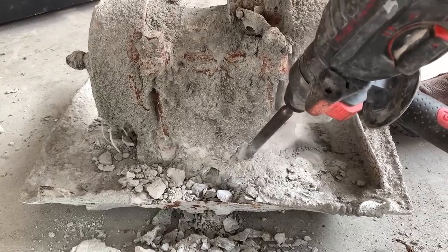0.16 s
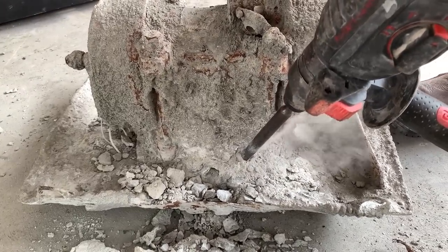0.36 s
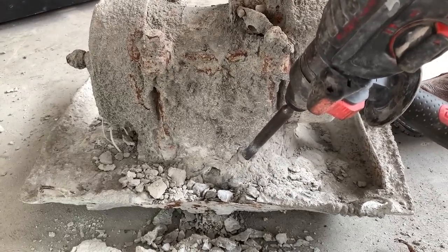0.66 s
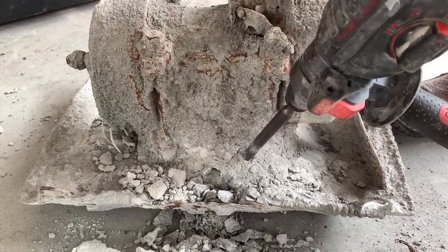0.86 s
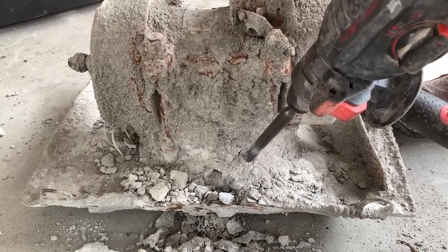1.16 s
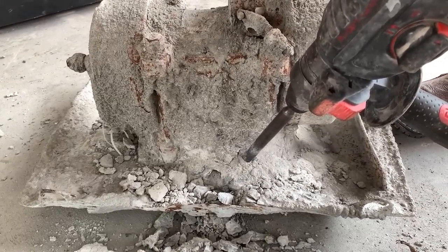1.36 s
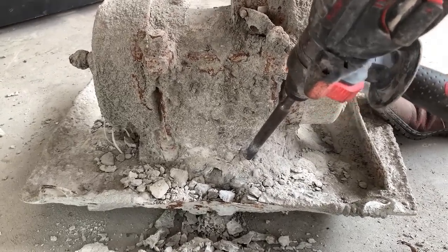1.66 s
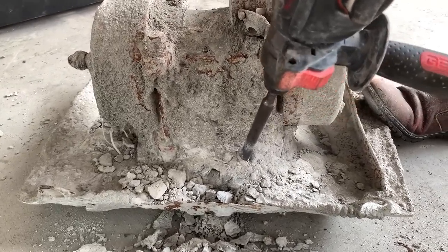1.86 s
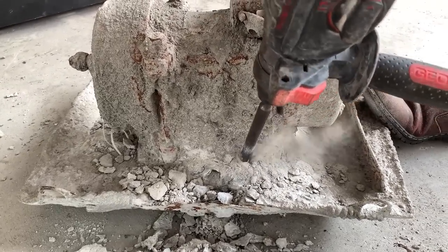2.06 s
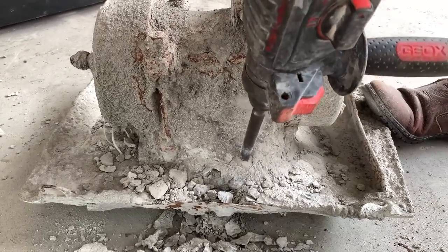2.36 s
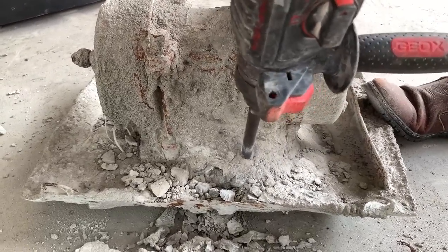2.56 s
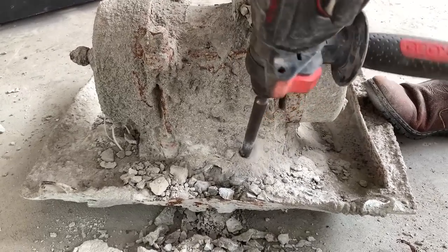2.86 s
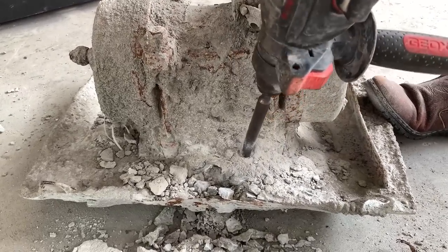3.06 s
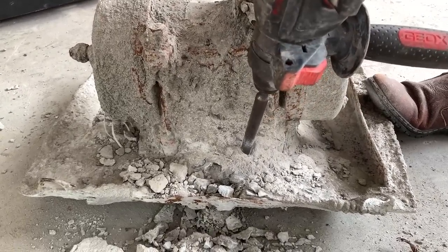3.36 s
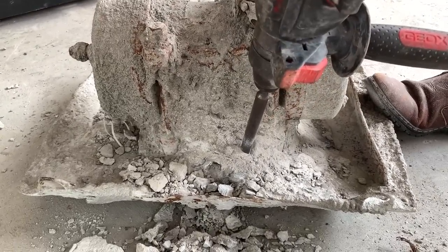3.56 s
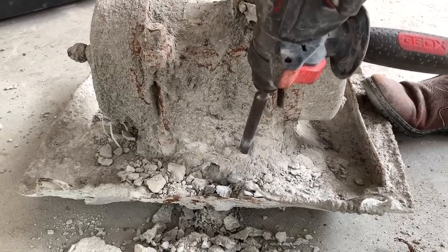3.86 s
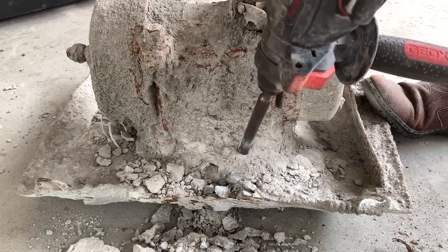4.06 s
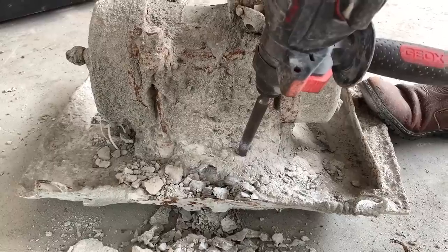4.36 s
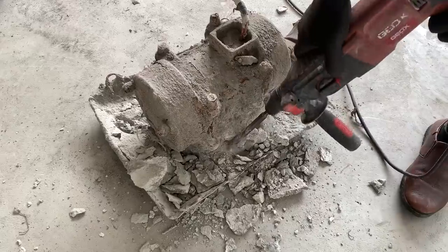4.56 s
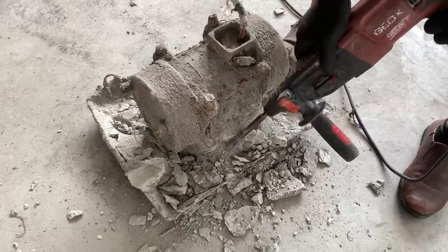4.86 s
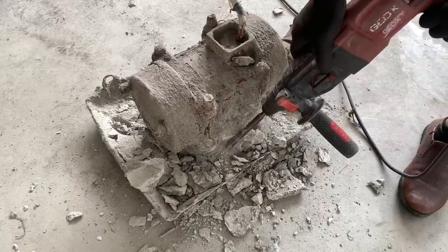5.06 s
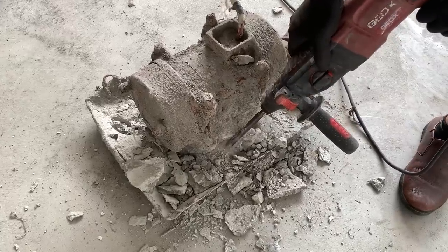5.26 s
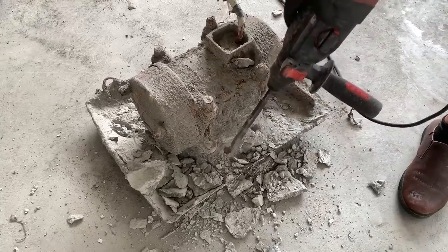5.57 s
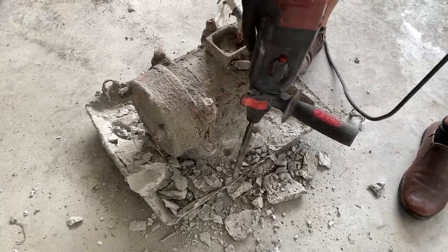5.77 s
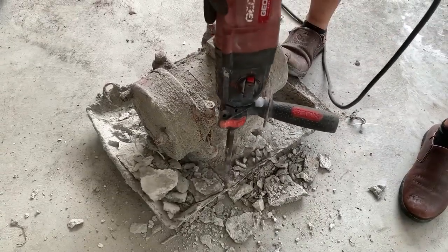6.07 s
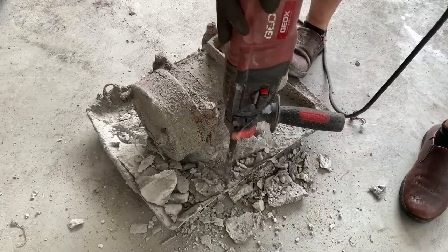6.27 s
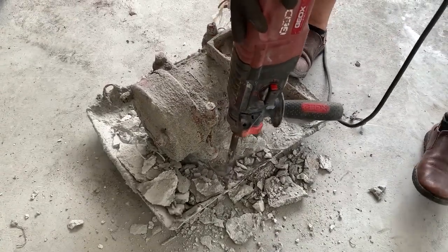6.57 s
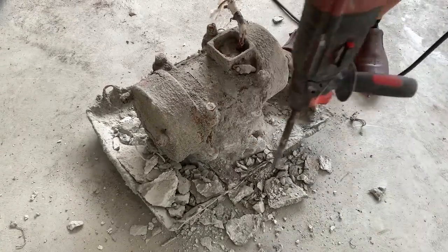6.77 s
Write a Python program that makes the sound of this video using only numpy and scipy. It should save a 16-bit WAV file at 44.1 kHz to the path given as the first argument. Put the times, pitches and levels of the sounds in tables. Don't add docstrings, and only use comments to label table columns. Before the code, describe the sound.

Harsh, fast metallic hammering with motor hum and dusty hiss runs in three bursts, coasting down to loose clacks between them in a workshop.

```python
import sys
import numpy as np
from scipy import signal
from scipy.fft import rfft, irfft, next_fast_len
from scipy.io import wavfile
from scipy.ndimage import uniform_filter1d, map_coordinates

SR = 44100
rng = np.random.default_rng(int(sys.argv[2]) if len(sys.argv) > 2 else 0)


def bounce(signal):
    frames = np.transpose(np.atleast_2d(signal))
    limited = np.clip(frames, -1, 1)
    pcm = np.round(limited * 32767).astype(np.int16)
    wavfile.write(sys.argv[1], SR, pcm)


def invert_db(x):
    u = np.asarray(x, float) / 20
    return 10 ** u


N = 305172


# centre_hz, width_hz, level_db, left_over_right_db, left_lead_rad
STEEP = [(910, 93, -20, 4, -0.84), (1474, 360, -8, -5, 0.97), (2040, 32, 0.5, 7, -0.53),
         (2666, 59, -3.5, 14.5, 1.57), (2812, 220, -6, 14, 0.0836), (3270, 825, 1, -5, -0.48),
         (3457, 663, -2, -10.5, -0.99), (3697, 85, -0.2, -15, 0.46), (3900, 1000, -13.5, 11.5, 2.5),
         (3990, 305, -0.25, -9, -2), (4156, 120, -11.5, -18.5, -1.92), (5080, 64, -7, -17.5, 1.5),
         (5430, 204, -11.5, -6, 2.5), (6290, 87, -7, 14.5, 3), (7180, 900, -10.5, -3, 1.35),
         (8700, 680, -22, 14, 0.8), (9350, 100, -11, -10.5, -2.5), (10140, 370, -11.5, -1, -0.75),
         (12500, 190, -11.5, -3, -3.5), (11670, 93, -22, 6, -1), (13330, 1300, -19, -10, 3),
         (14300, 133, -19.5, 12, 2.5), (16600, 130.0, -47, -32, -55)]
SHIFTING = [(580, 110, -13.5, -4, 0.5), (1293, 240, -7, 1.5, -2.13), (1505, 79, -1.5, -6.5, -1.46),
            (2081, 74, -2.5, 1, 0.7142), (2430, 28, -3.5, 2.5, 0.72), (3170, 134, -9, -0.5, -1.9),
            (3400, 190, -9.5, -12.5, 2.5), (3693, 198, 0.5, 6.5, 0), (3836.4, 86, 1, -3.5, 2.5),
            (3908, 115, 5, 4.5, 2.5), (4256, 295, -1, -3.5, 0.72), (5230, 80, -3.5, 7.5, 1.2),
            (6090, 86, -6.5, -8.5, 0), (6460, 217, -12, 13, 1.9), (6890, 126, -4.5, -3, -1.5),
            (7380, 56, -8.5, -2, 2), (7950, 230, -8, 2, -0.2), (9530, 940, -12, -2.5, 0.66),
            (9730, 68, -17.5, -27.5, 14), (12400, 95, -16, 4, 4), (13565.0, 160, -28, -5, -3.5),
            (14221.0, 130.0, -34, -12, -8), (15079.0, 130.0, -38, -7, -12)]
PRESSED = [(1195, 180, -7.5, -3.5, 0), (1435, 280, -7.5, -3, 0.2), (1590, 83, -3, 1, 0.2),
           (2068, 68, -1.5, 1, -0.5), (2608, 104, -8, -1.5, 0.8), (2968, 46.6, -2, -3, -0.04),
           (3630, 340, 0.5, -0.5, 0.58), (3831, 79, -5.5, -9.5, -3.5), (3872, 74, -10.5, -11, -0.5),
           (3980, 255, 3.5, -3, 0.73), (4134, 168, 4.5, 1.5, 0.22), (4680, 75, 0.5, -3, -3.5),
           (5020, 107, -3.5, -9, -1.1), (6280, 290, -2, 1, 1.55), (6840, 270, -4, 2.5, 1.9),
           (8690, 250, -6, -4, 0.6), (9380, 100, -2.5, 0.5, 1.5), (9900, 840, -8.5, 2, -0.12),
           (11400, 670, -11.5, 3, -2.5), (12528.0, 208.0, -31, -2, 3.05), (14005.0, 133.0, -32, 20, 1.5),
           (15107.0, 151.0, -26, 1.5, -3), (15800, 230, -19, -14, 1.5)]
SIDEWAYS = [(1285, 500, -11.5, -2.5, 0.46), (2067, 70, 2, 1, 0.64), (2520, 200, -0.5, 0.5, -3),
            (2743, 88, 5, -3.5, 0.25), (2860, 1113, -6.5, 5.5, 2.0759), (3350, 257, -1.5, 8, 2.5),
            (3500, 192.5, -1.6, -10.5, 0.4), (3650, 250, -2.5, 1, 1.35), (3750, 720, -5, 0, 4),
            (4070, 110, -18.5, -9, 3), (4350, 230, -2.5, -9, 1), (4500, 66, -16, -5, -0.98),
            (5284, 57, -5, 3, -3.5), (5794, 25, -4.5, 1, 4.5), (6700, 100, -14, -3, 4.5),
            (8087.0, 75, -10.5, 5, 2.5), (9130, 51, -11.5, -7.5, 1), (9860, 670, -16.5, -1.5, 1.6),
            (11120, 170, -8.5, -1, 1.17), (12100, 450, -24, 0, 1.3), (13600, 1000, -20.5, -5, -4),
            (15300, 316.0, -26, 12, 4.5), (15200, 652.0, -39, 3.9, 2)]
UPRIGHT = [(676, 74, -8.5, -7, 0.5), (1050, 230, -9, 0.2, 0.5), (1430, 160, -11, 1.5, 1),
           (1860, 330, -3.5, 6.5, 0.77), (2370, 620, -0.8, 1, 0.35), (2652, 105, 4, -3, 1.3),
           (3108, 110, -11, 6, 2), (3297, 78, -10, -9, 2), (3202, 960, -2.5, 2.5, -2),
           (3780, 460, -5, 6, -2), (4590, 268, -8, 10, 2), (5020, 300, -2, 0, 0.34),
           (5710, 200, -3.5, -1.5, 0.57), (5970, 710, -10, 3.5, 0.7), (7400, 390, -28, -9, 1.5),
           (8840, 580, -20.5, -6, 2), (11000, 150, -25, -15, 5.5), (11070, 330, -21.5, -11, -2),
           (12200, 560, -29.5, 22, -13), (12800, 62, -21, -14.5, 4), (14300, 176.0, -34.5, 14, 1.5),
           (15003.0, 133.0, -52, 9, -4), (15100, 817.0, -35, -9, 3)]
# centre_hz, width_hz, level_db
SKIDDING = [(620, 210, -6), (1040, 360, -11), (1320, 250, -9), (2500, 400, -8), (3110, 440, -9.5),
            (1874, 350, -3), (3760, 120, 4), (4091.7, 66, 2.5), (5500, 430, -3), (6200, 100, -5),
            (6865, 64, 1.5), (7140, 300, 1.5), (7870, 174, -1), (8370, 192, 3), (8800, 100, 6),
            (9470, 120, 3.5), (10300, 110, -6.5), (15400, 200, -6)]
# centre_hz, width_hz, level_db
BITING = [(720, 94, -7), (1050, 130, -8), (1389, 140, -5.5), (1912, 200, -1), (2220, 290, 1.7),
          (2800, 240, 0), (3250, 400, -3.5), (3620, 200, 0), (4500, 272, -5.5), (4994, 308, -3.5),
          (5500, 217, -7), (6000, 450, -7.5), (7030, 480, -16), (8400, 410, -17), (10000, 500, -24),
          (11400, 500, -23), (13600, 600, -27), (15300, 500, -26)]
# centre_hz, width_hz, level_db
SLIDING = [(700, 78, -8), (1075, 130, -7), (1390, 110, -6), (1900, 200, -2.5), (2430, 280, 0.3),
           (2700, 170, 0), (3155, 320, -0.5), (3720, 220, -3), (4860, 270, -4), (5320, 340, -4),
           (5800, 350, -6), (7130, 300, -15.5), (8400, 400, -15), (9500, 370, -24), (11000, 450, -16.5),
           (12800, 500, -22), (15200, 500, -23)]
STANCE_CHANGES = [
    1.588,
    2.035,
    3.161,
    4.441,
    5.532,
    5.82,
    6.039,
    6.51,
    6.762,
]
STANCE_TAKEN = [
    0,
    5,
    1,
    2,
    3,
    1,
    6,
    4,
    7,
    1,
]
SHINE = [-3.5, 2.5, -2.5, 0.5, -1.5, 7, 0.5, -2.5]
# freq_hz, level_db
CRUSH_COLOUR = [(300, 0), (700, -10.5), (1500, 0), (3000, 1.5), (6000, 6.5), (10000, 4), (12500, 3),
                (15000, 2)]
# freq_hz, level_db
AIR_COLOUR = [(200, -35.5), (400, -32), (700, -40), (1200, -46), (3000, -5.5), (8000, -3.5), (12000, -6.5),
              (15500, -8)]
# start_s, peak_db, bit_ring_over_peak_db
COASTING_BLOWS = [(4.3, -53.5, -5), (4.328, -53.5, -1), (4.3654, -52.5, -1.5), (4.424, -59, -23),
                  (4.453, -57, -11), (5.735, -36, -21), (5.74, -43, -25), (5.757, -41, -26),
                  (5.783, -43.5, -24), (5.8115, -38.5, -22.5), (5.8301, -36.5, -20.5), (6.7955, -48, -9),
                  (4.5318, -48, -2)]
# start_s, peak_db, bit_ring_over_peak_db
TICKS = [(4.4584, -64, -19), (4.4667, -55, -14), (6.7764, -50, -15), (6.7884, -50, -14), (6.8118, -48, -17),
         (6.8214, -52, -17), (6.8271, -51, -12), (6.8344, -56, -15), (6.841, -54.5, -17), (6.853, -53, -15),
         (6.8564, -56, -15), (6.8674, -56, -16), (6.8784, -64, -17), (6.8994, -58, -16)]


def hammer(strike, crush, air, blow_db, ring_db):
    split_hz, blend_s, shine_hz = 6000, .06, 11500
    s, peak_db, bright_db = np.transpose(COASTING_BLOWS + TICKS)
    thud = pulses(s, invert_db(peak_db + 10.5))
    ping = pulses(s, invert_db(peak_db + 15.5 + bright_db))
    stances = [STEEP, SHIFTING, PRESSED, SIDEWAYS, UPRIGHT,
               facing(SKIDDING, SHIFTING), facing(BITING, UPRIGHT), facing(SLIDING, UPRIGHT)]
    out = np.zeros((2, 2, N + SR))
    t = np.arange(N) / SR
    edges = [-1, *STANCE_CHANGES, 9]
    paths = rng.standard_normal((len(SHINE), 32))
    for taken, a, b in zip(STANCE_TAKEN, edges, edges[1:]):
        held = np.sqrt(np.clip(np.minimum(t - a, b - t) / blend_s + .5, 0, 1))
        span = slice(*np.flatnonzero(held)[[0, -1]])
        m = next_fast_len(span.stop - span.start + SR // 20)
        place = slice(span.start, span.start + m)
        hz = np.fft.rfftfreq(m, 1 / SR)
        high = 1 / (1 + (split_hz / (hz + 1)) ** 6)
        clean = ringing(stances[taken], hz, widen=1.0)
        rough = ringing(stances[taken], hz, widen=3.1) * invert_db(along(CRUSH_COLOUR, hz))
        travel = np.exp(1.3j * map_coordinates(paths[taken], [hz / 800]))
        shine = invert_db(SHINE[taken] / (1 + (shine_hz / (hz + 1)) ** 16))
        for band, db, coast in [(1 - high, blow_db, thud), (high, blow_db + ring_db, ping)]:
            drive = held * invert_db(db)
            hits = (drive * strike + held * coast)[span]
            rung = rfft(hits, m) * unit(clean * band)
            out[0, :, place] += irfft(rung * travel * shine, m)
            ragged = rfft((drive * crush)[:, span], m) * unit(rough * band)
            hiss = rfft((drive * air)[:, span], m) * invert_db(along(AIR_COLOUR, hz)) * band
            out[1, :, place] += irfft((ragged + hiss) * shine, m)
    return out[..., :N]


def ringing(modes, hz, widen):
    bass_hz = 910
    side = np.array([[.5], [-.5]])
    both = 0
    for k, (centre, width, db, pan_db, lead) in enumerate(modes):
        loss = 1j * hz * width * widen
        port = invert_db(db + side * pan_db) * np.exp(1j * side * lead * hz / centre)
        both = both + (-1) ** k * port * loss / (centre * centre - hz * hz + loss)
    return both / (1 + (bass_hz / (hz + 1)) ** 8 / widen ** 4)


def facing(peaks, modes):
    faced = []
    for centre, width, db in peaks:
        nearest = min(modes, key=lambda mode: abs(mode[0] - centre))
        faced.append((centre, max(width, 70), db, *nearest[3:]))
    return faced


def drives(rate, blows, loose, lifted):
    puff_t60_s, glance_db, glance_scatter_db = 0.015, -1.5, 2.6
    at = (blows * SR).astype(int)
    luck = rng.standard_normal((len(blows), 4))
    weight = np.sqrt(SR / rate[at])
    strike = pulses(blows + 8e-6 * luck[:, 0], weight * invert_db(0.078 * luck[:, 1])) * np.sqrt(1 - loose)
    late = blows + 0.000804 * loose[at] * luck[:, 2]
    puff = invert_db(-60 * np.arange(SR // 20) / SR / puff_t60_s)
    bursts = pulses(late, weight * invert_db(0.76 * loose[at] * luck[:, 3]))
    gate = signal.fftconvolve(bursts, puff / np.linalg.norm(puff))[:N]
    chips = rng.standard_normal((3, N))
    grit = np.abs(gate) + 0.56 * invert_db(5.8 * wobble(90))
    crush = (chips[0] + 0.43 * chips[1:]) * grit * np.sqrt(loose)
    air = (chips[0, ::-1] + 1.24 * rng.standard_normal((2, N))) * (0.621 + .5 * loose)
    glance_size = invert_db(glance_db + glance_scatter_db * luck[:, 3]) * loose[at] * np.sqrt(1 - lifted[at])
    glance = pulses(late, weight * glance_size)
    return strike, crush * invert_db(-4.5) + glance, air


# time_s, blow_db
LEAN = [
    [(0, -43.5), (.37, -42), (1.5, -43), (2.2, -44.5), (3.2, -42), (3.77, -40.5), (4.05, -42.5),
     (4.19, -52.5), (4.29, -64.5)],
    [(4.45, -83.5), (4.51, -66), (4.535, -59.5), (4.58, -40.5), (5.49, -41.5), (5.53, -54.5), (5.55, -56),
     (5.72, -65)],
    [(5.82, -74), (5.835, -42.5), (5.91, -36.5), (5.93, -33), (6.03, -34), (6.28, -38), (6.52, -39.5),
     (6.555, -42), (6.6, -39), (6.66, -40), (6.73, -50), (6.77, -67)],
]
BIT_RING = [0, -4.5, -3, -6, -7, -8, -6.5, -8.5]


def effort(skid, lifted):
    end_db, skid_loss_db, skid_dull_db, skid_flutter_db = -71.5, -3, -4, 4
    run_up_dull_db, run_up_dull_s, lifted_ring_db = -7, 0.15, -2
    rattle_db, rattle_t60_s = -11.5, 0.035
    t = np.arange(N) / SR
    lean = invert_db(curves(sum(LEAN, []) + [(N / SR, end_db)])[0] + skid_loss_db * skid)
    rattle = sum(invert_db(db + rattle_db - 60 * np.abs(t - s) / rattle_t60_s) * (t > s) for s, db, _ in COASTING_BLOWS)
    fresh = sum(np.exp(-((t - on) / run_up_dull_s) ** 2) * (t > on) for on, *_ in PULLS)
    ring_db = by_stance(BIT_RING) + skid * (skid_dull_db + skid_flutter_db * wobble(25.62))
    ring_db = ring_db + run_up_dull_db * fresh + lifted_ring_db * lifted
    return 20 * np.log10(lean + rattle), ring_db - 12 * rattle / (lean + rattle)


# time_s, rate_hz
RUNNING = [(.1, 173.8), (.4, 174.9), (.85, 174.2), (3.15, 174.3), (3.25, 174.9), (3.6, 175.9),
           (3.85, 175.4), (6.3, 175.6), (6.45, 175.4), (6.55, 174.8), (6.65, 173.6)]
# start_s, first_rate_hz, run_up_s, run_up_exponent
PULLS = [
    (-1, 100, .05, 1),
    (4.505, 100, .07, 1.4),
    (5.838, 85, .04, .85),
]
# start_s, coasting_s, last_regular_blow_s
RELEASES = [
    (4.04, .18, 4.288),
    (5.5, .16, 5.7),
    (6.665, .127, 6.77),
]
BEAT = [
    4.1805,
    4.5653,
    5.8432,
]


def shaft(skid):
    sag_hz = 2.3
    t = np.arange(N) / SR
    full = curves(RUNNING)[0] - sag_hz * skid
    rate = full.copy()
    for (on, start, rise, shape), (off, coast, _) in zip(PULLS, RELEASES):
        up = full - (full - start) * np.exp(-(np.abs(t - on) / rise) ** shape)
        rate = np.where(t >= on, up * np.exp(-np.maximum(t - off, 0) / coast), rate)
    turns = np.cumsum(rate) / SR
    blows = []
    for pull, release, beat in zip(PULLS, RELEASES, BEAT):
        first, mark, last = np.interp([pull[0], beat, release[2]], t, turns)
        blow_turns = mark + np.arange(np.ceil(first - mark), last - mark)
        blows.append(np.interp(blow_turns, turns, t))
    return turns, rate, rate / full, np.concatenate(blows)


# order1_db, order2_db, order3_db, order4_db, order5_db
HUM = [(-40.5, -35.5, -28, -39, -51), (-34.5, -32.5, -29.5, -31, -40), (-46, -32.5, -31, -49, -37),
       (-56, -28, -28, -34.5, -31), (-50, -39, -29, -22.5, -36), (-37, -32, -23, -33, -36),
       (-53, -33, -29.5, -32.5, -40), (-56, -32, -28.5, -27, -30)]


def casing(turns, rate, speed, blow_db, skid, lifted):
    boom_hz, boom_width_hz, boom_db = 260, 50, 9
    wake_s, speed_power, skid_db, lifted_db = .035, .5, -0.5, -8
    t = np.arange(N) / SR
    tones = 0
    for order, db in enumerate(np.transpose(HUM), 1):
        hz = order * rate
        boom = boom_db / (1 + ((hz - boom_hz) / boom_width_hz) ** 2)
        bass_loss = 10 * np.log10(1 + (150 / hz) ** 8)
        level_db = by_stance(db) + boom - bass_loss + 1.47 * wobble(12)
        tones = tones + invert_db(level_db) * np.sin(2 * np.pi * order * turns)
    awake = np.prod([1 - np.exp(-((t - on) / wake_s) ** 2) for on, *_ in PULLS], axis=0)
    level = invert_db(blow_db + skid_db * skid + lifted_db * lifted + 1.5)
    return awake * level * speed ** speed_power * tones * invert_db([[-.4], [.4]])


# start_s, level_db, freq_hz, t60_s
THUMPS = [
    (3.985, -61, 257, .25),
    (.24, -73, 112, .15),
    (2.08, -69, 140, 0.26),
    (4.36, -70, 153, 0.14),
    (5.381, -72, 130, .15),
    (5.53, -70, 720, 0.49),
    (5.735, -67, 247, 0.103),
    (5.735, -69, 353, .1),
]


def thumps():
    rise_s = 0.0057
    t = np.arange(N) / SR
    knocks = 0
    for s, db, hz, t60 in THUMPS:
        since = np.maximum(t - s, 0)
        onset = 1 - np.exp(-since / rise_s)
        knocks = knocks + invert_db(db - 60 * since / t60) * onset * np.sin(2 * np.pi * hz * since)
    return knocks


# freq_hz, t60_s
SHOP_DECAY = [(200, 0.22), (2000, 0.23), (12000, 0.046)]


def shop(x):
    hz, t, z = signal.stft(rng.standard_normal((2, SR // 2)), SR, nperseg=256)
    fade = invert_db(-60 * t / along(SHOP_DECAY, hz)[:, None])
    tail = signal.istft(z * fade, SR, nperseg=256)[1]
    delayed = np.pad(x, ((0, 0), (400, 0)))
    return signal.fftconvolve(delayed, tail / np.linalg.norm(tail[0]), axes=1)[:, :N]


# freq_hz, density_db_per_hz
RUMBLE_COLOUR = [(15, -78), (25, -85), (97, -18.5), (194, -15.5), (243, -10), (267, -14), (287, -12.5),
                 (545, -19.5), (700, -17.5), (1000, -29.5), (1900, -77)]


def rumble(level_db):
    m = next_fast_len(N)
    noise = rng.standard_normal((3, m))
    hz = np.fft.rfftfreq(m, 1 / SR)
    colour = invert_db(along(RUMBLE_COLOUR, hz)) * (hz / (hz + 60)) ** 2
    pair = irfft(rfft(noise[0] + .7 * noise[1:]) * colour, m)[:, :N]
    return invert_db(level_db) * unit(pair * invert_db(5 * wobble(9)))


def drone():
    drone_hz, drone_db = 253, -89.5
    level = invert_db(drone_db + 2.5 + 1.7 * wobble(15))
    return level * np.sin(2 * np.pi * drone_hz * np.arange(N) / SR + wobble(22))


def unit(x):
    return x / np.sqrt(np.mean(np.abs(x) ** 2) + 1e-20)


def along(points, hz):
    f, v = np.transpose(points)
    return np.interp(np.log(hz + 1), np.log(f + 1), v)


def curves(rows):
    s, *cols = np.transpose(rows)
    return [np.interp(np.arange(N) / SR, s, c) for c in cols]


def wobble(rate):
    return map_coordinates(rng.standard_normal(int(N * rate / SR) + 4), [np.arange(N) * rate / SR])


def pulses(s, size):
    at = np.asarray(s)[:, None] * SR
    near = np.floor(at) + np.arange(-7, 9)
    shape = np.sinc(near - at) * np.cos(np.pi * (near - at) / 16) ** 2
    index = np.clip(near, 0, N - 1).astype(int)
    return np.bincount(index.ravel(), (shape * np.asarray(size)[:, None]).ravel(), N)


def spells(rows, slide):
    t = np.arange(N) / SR
    return np.max([h * np.clip(np.minimum(t - a, b - t) / slide + .5, 0, 1) for a, b, h in rows], axis=0)


SLIDE_S = .04


def by_stance(values):
    edges = np.add.outer(STANCE_CHANGES, [-SLIDE_S, SLIDE_S]).ravel()
    return np.interp(np.arange(N) / SR, edges, np.repeat(np.take(values, STANCE_TAKEN), 2)[1:-1])


def drifting(x):
    drift_db = .6
    z = signal.stft(x, nperseg=512)[2]
    field = uniform_filter1d(rng.standard_normal(z.shape[-2:]), size=5, axis=0)
    field = uniform_filter1d(field, size=50, axis=1)
    return signal.istft(z * invert_db(drift_db * unit(field)), nperseg=512)[1][..., :N]


# start_s, end_s, looseness_0_1
SKIDS = [(1.59, 2.02, .95), (1.95, 2.07, .45), (2.33, 2.68, .25), (2.42, 2.59, .85), (2.79, 2.86, .7),
         (2.8, 3.1, .45), (3.05, 3.22, .25), (4.56, 4.74, .22), (5.4, 5.5, .18), (5.99, 6.05, .2),
         (6.5, 6.66, .12), (6.545, 6.57, .8)]
# start_s, end_s
LIFTS = [
    (4.27, 4.535),
    (5.51, 5.79),
    (6.73, 8),
]
SEATED = [.04, .09, .035, .06, .03, .1, .06, .05]
SHAKE = [10.1, 11, 10, 8.7, 2.4, 10.3, 8.9, 4.4]


def scene():
    skid_s, lifted_looseness, off_speed_looseness = .05, .88, .2
    rumble_db, skid_shake_db, off_speed_shake_db, coasting_shake_db = -89, 7.5, 5, 21.5
    skid = spells(SKIDS, skid_s)
    lifted = spells([(a, b, 1) for a, b in LIFTS], SLIDE_S)
    turns, rate, speed, blows = shaft(skid)
    off_speed = np.clip(10 * (1 - speed), 0, 1)
    loose = np.max([by_stance(SEATED), skid, lifted_looseness * lifted, off_speed_looseness * off_speed], axis=0)
    blow_db, ring_db = effort(skid, lifted)
    clean, ragged = hammer(*drives(rate, blows, loose, lifted), blow_db, ring_db)
    hum = casing(turns, rate, speed, blow_db, skid, lifted)
    working_db = by_stance(SHAKE) + skid_shake_db * skid + off_speed_shake_db * off_speed
    shake_db = (1 - lifted) * working_db + coasting_shake_db * lifted * speed
    direct = drifting(clean + ragged) + thumps() + drone() + hum
    steady = invert_db(-6) * clean
    walls = invert_db(-6.5) * shop(steady + ragged + invert_db(-5.5) * hum)
    return direct + walls + rumble(rumble_db + shake_db)


def low_pass(x):
    return signal.sosfilt(signal.butter(12, 16530, fs=SR, output="sos"), x)


def record(dry):
    top_hz, foot_hz, quiet_db, quiet_hz = 15830, 55, -66, 12000
    m = next_fast_len(N)
    hz = np.fft.rfftfreq(m, 1 / SR)
    kept = rfft(dry, m) * (hz < top_hz) / (1 + (foot_hz / (hz + 1)) ** 4)
    power = np.abs(uniform_filter1d(np.mean(dry ** 2, axis=0), size=900))
    level_db = 10 * np.log10(power + 1e-12)
    muted = np.clip((quiet_db - level_db) / 2 + .5, 0, 1)
    treble = irfft(kept * (hz > quiet_hz), m)[:, :N]
    mix = irfft(kept, m)[:, :N] - muted * treble
    return low_pass(mix)


dry = scene()
out = record(dry)
bounce(out)
```